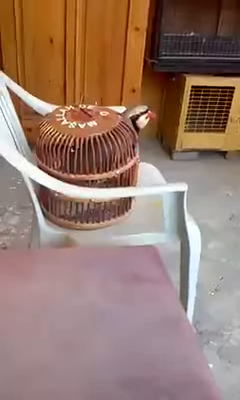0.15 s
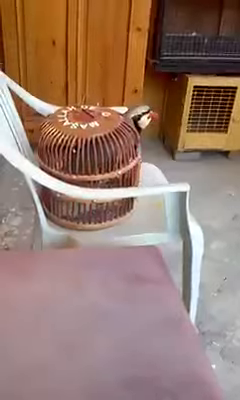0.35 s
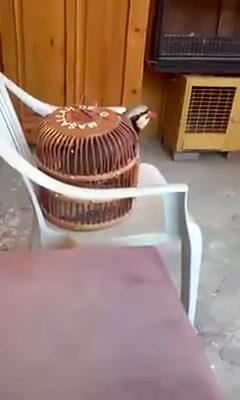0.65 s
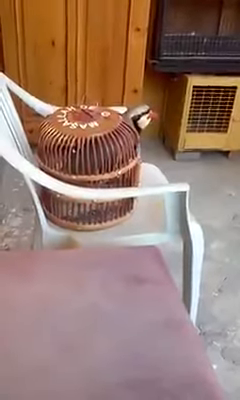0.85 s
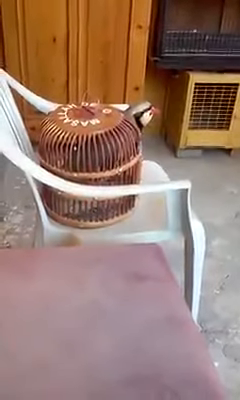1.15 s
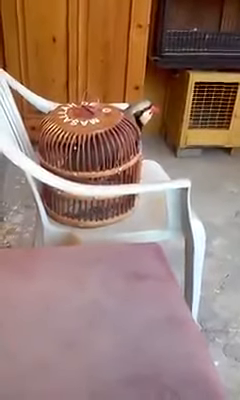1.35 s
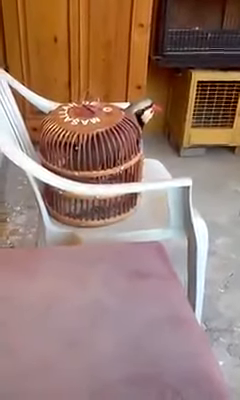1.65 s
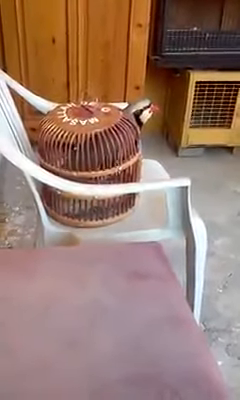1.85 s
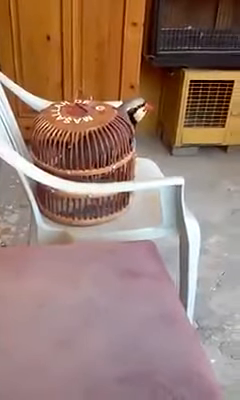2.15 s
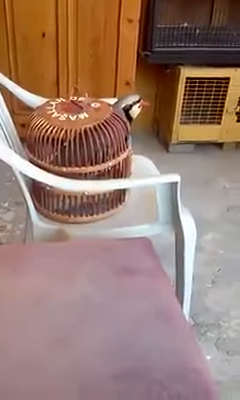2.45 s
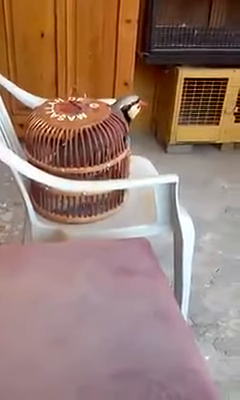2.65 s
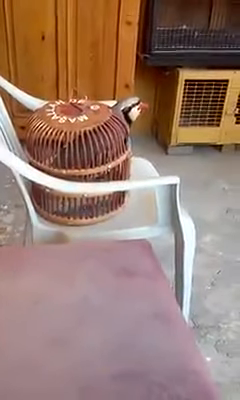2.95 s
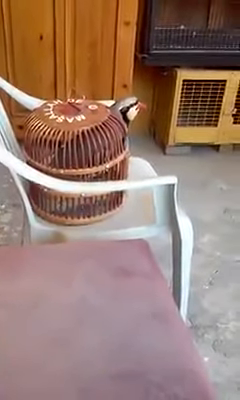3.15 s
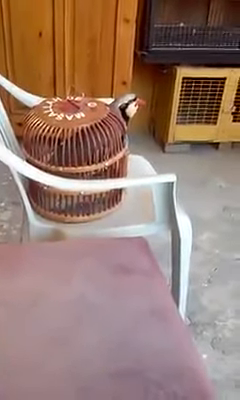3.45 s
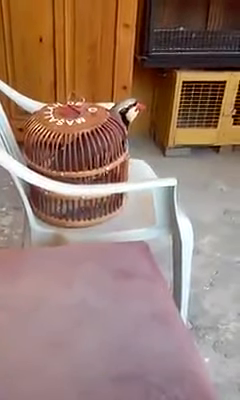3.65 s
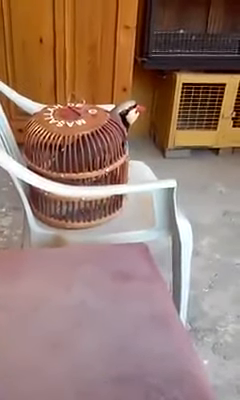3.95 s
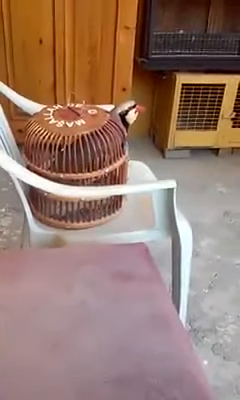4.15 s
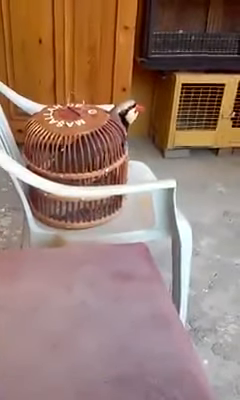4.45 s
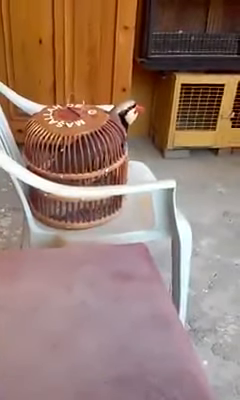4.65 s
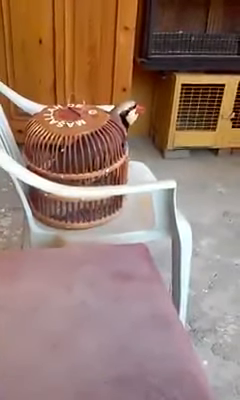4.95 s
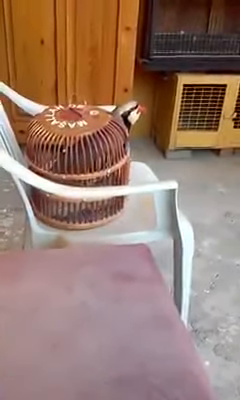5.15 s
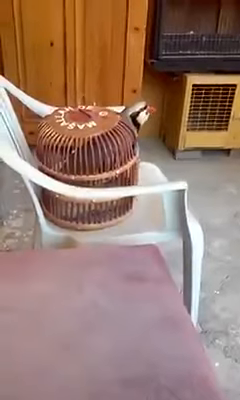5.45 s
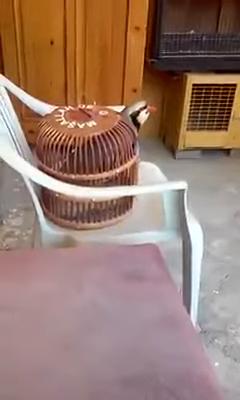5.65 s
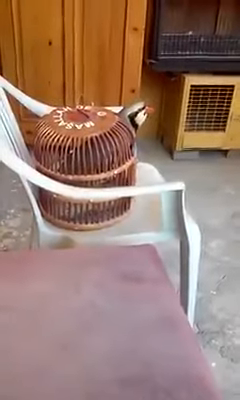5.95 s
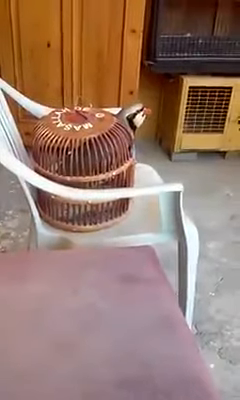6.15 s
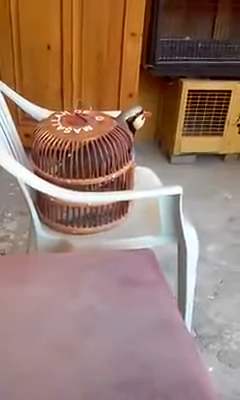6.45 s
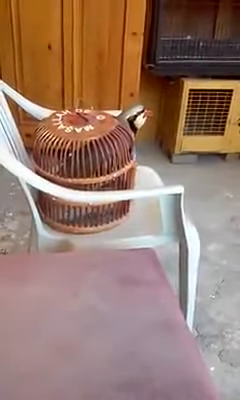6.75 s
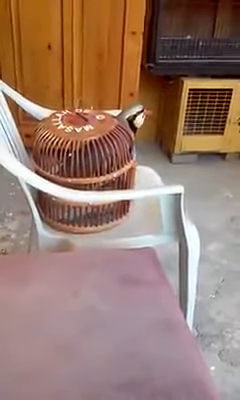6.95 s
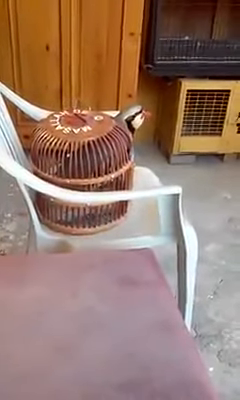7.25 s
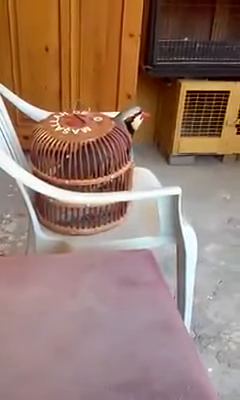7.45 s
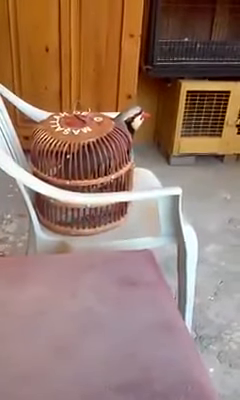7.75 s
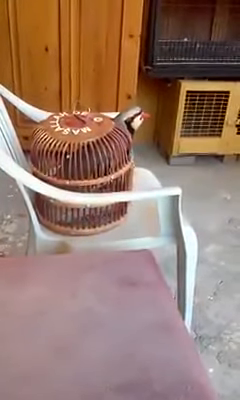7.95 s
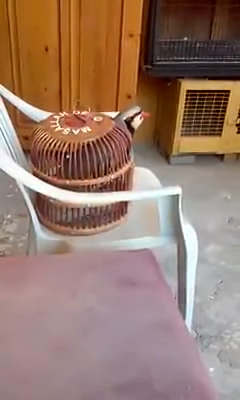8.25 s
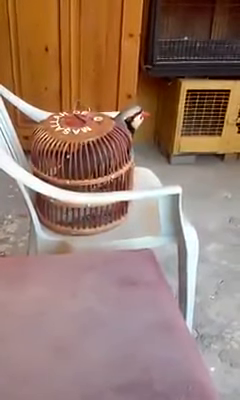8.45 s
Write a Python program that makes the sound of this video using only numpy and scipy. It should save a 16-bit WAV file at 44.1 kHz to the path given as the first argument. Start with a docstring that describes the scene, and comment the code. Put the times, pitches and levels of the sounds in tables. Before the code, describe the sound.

One partridge dominates, heard close in a small walled yard. Dry, woody, rasping chaks come fast, then in a limping pattern of loud call, quiet clucks and weaker call, before a relentless steady burst through the middle. The last calls space out and cease. Faint far bird whistles appear once early and again after the calling. Low airy noise and a wavering hum lie beneath, dropping to near silence in the mono pickup.

```python
"""Loud, falling "chak" syllables of a partridge and soft raspy clucks, about seven a second, ring in a walled yard.
Each is a source-filter voice: syrinx pulses and air puffs excite the throat, windpipe and beak resonances.
Echoes, standing waves and a short diffuse tail form the courtyard.
Far birds whistle as gliding sines, wavering low tones swell as a hum, and shaped noise is the background,
which drops steeply near the end."""
import sys
import numpy as np
from scipy import signal
from scipy.fft import rfft, irfft
from scipy.io import wavfile

SR = 44100
rng = np.random.default_rng(int(sys.argv[2]) if len(sys.argv) > 2 else 0)


def log_audio(samples):
    """Write samples as a 16-bit WAV file to the path given in sys.argv[1]."""
    # one column per channel
    frames = np.atleast_2d(samples).T
    # limit to full scale, then quantise
    limited = np.clip(frames, -1, 1)
    pcm = np.round(limited * 32767).astype(np.int16)
    wavfile.write(sys.argv[1], SR, pcm)


N = 379392
TIME = np.arange(N) / SR  # s


def gain_of(db):
    """Logarithmic level: 20 dB is a factor of ten in amplitude."""
    return 10 ** (np.asarray(db) / 20)


def evened(x):
    """Equal power: scales a signal to an rms of 1."""
    return x / np.sqrt(np.mean(x ** 2) + 1e-20)


def read(points, hz):
    """Logarithmic frequency scale: interpolates a table of (Hz, value) along it."""
    f, value = np.transpose(points)
    return np.interp(np.log(hz + 1), np.log(f + 1), value)


def add(mix, s, sound):
    """Superposition: adds a sound to the mix from time s in seconds."""
    part = mix[max(round(s * SR), 0):][:len(sound)]
    part += sound[:len(part)]


def colour(x, points):
    """Linear filtering: multiplies the spectrum by a table of (Hz, dB)."""
    hz = np.fft.rfftfreq(len(x), 1 / SR)
    return irfft(rfft(x) * gain_of(read(points, hz)), len(x))


def wander(size, rate_hz):
    """Random modulation: straight lines join normal random values drawn rate_hz times a second."""
    at = np.arange(size) * rate_hz / SR
    knots = rng.standard_normal(size // 20 + 4)
    return np.interp(at, np.arange(len(knots)), knots)


def resonate(x, hz, width_hz):
    """Moving resonance: shifts hz down to zero, smooths with one pole and shifts back."""
    turn = np.exp(2j * np.pi * np.cumsum(hz * np.ones(len(x))) / SR)
    pole = np.exp(-np.pi * width_hz / SR)
    smoothed = signal.lfilter([1 - pole], [1, -pole], x / turn)
    return 2 * (turn * smoothed).real


def arch(u, peak, sharp):
    """Amplitude envelope: a warped half sine, zero at u = 0 and 1, with its top at the peak."""
    warped = np.interp(u, [0, np.clip(peak, .05, .95), 1], [0, .5, 1])
    return np.sin(np.pi * warped).clip(0) ** abs(sharp)


def partridge():
    """Call sequence: superposes open-beaked chaks and rougher clucks with the beak nearly shut."""
    # Loud syllables that drop in pitch. Each row: start in seconds, nominal level in dB, length in seconds.
    chaks = [(0.156, -19.5, 0.046), (.282, -19, .044), (0.417, -20.5, 0.051), (0.551, -21.5, 0.05),
             (0.69, -19, .048), (.831, -17, .045), (0.965, -16.5, 0.046), (1.259, -26, 0.044),
             (1.42, -18, 0.043), (1.739, -26.5, 0.044), (1.909, -17.5, 0.059), (2.214, -31, 0.046),
             (2.385, -20.5, 0.055), (2.698, -27, 0.042), (2.879, -22.5, 0.048), (3.187, -27.5, .038),
             (3.373, -18.5, 0.041), (3.696, -30.5, .044), (3.887, -18, 0.052), (4.044, -18, 0.054),
             (4.33, -26, .037), (4.502, -16, 0.046), (4.648, -17, .05), (4.798, -16, 0.052),
             (4.953, -17, 0.055), (5.109, -16.5, .049), (5.26, -16.5, .042), (5.415, -17.5, 0.05),
             (5.544, -16.5, 0.042), (5.69, -19, .053), (5.827, -18, .047), (5.975, -19.5, 0.053),
             (6.124, -17, .045), (6.271, -15.5, .047), (6.395, -18, 0.052), (6.533, -15, 0.046),
             (6.666, -19.5, 0.054), (6.867, -15.5, .052), (7.006, -18.5, 0.047), (7.18, -29.5, .048),
             (7.353, -16, 0.048), (7.658, -26, 0.049)]
    # Soft syllables on an almost level pitch.
    # Each row: start in seconds, nominal level in dB, length in seconds, pitch in Hz.
    clucks = [(1.111, -37, 0.04, 434.7), (1.238, -39, 0.028, 435), (1.551, -35.5, 0.05, 446.2),
              (1.687, -40, 0.046, 435), (2.053, -34, 0.054, 464), (2.183, -38.5, 0.042, 448.5),
              (2.529, -33.5, 0.057, 467), (2.657, -38, .044, 449), (3.021, -34.5, 0.047, 456),
              (3.144, -40, 0.038, 464), (3.531, -32, 0.05, 420.7), (3.662, -38.5, .036, 437),
              (4.205, -31, 0.039, 418.5), (4.32, -35, 0.039, 412), (7.143, -36.5, 0.052, 485.7),
              (7.493, -32, 0.047, 498), (7.613, -38, 0.072, 464)]
    out = np.zeros(N)
    for s, level_db, length in chaks:
        add(out, s, chak(s, level_db, length))
    for s, level_db, length, pitch_hz in clucks:
        add(out, s, cluck(level_db, length, pitch_hz))
    return out


def chak(s, level_db, length):
    """Vocal effort: a louder open-beaked call has higher resonances and a thinner fundamental."""
    # Colour of the rasp with the beak open. Each row: frequency in Hz, gain in dB.
    beak_open = [(1500, -48.5), (2050, -9.5), (2650, -12), (3350, -1.5), (3850, -4.5), (4400, 1),
                 (5150, -5), (5700, -35), (7000, -53.5)]
    # The bird settles: early windpipe resonances are high, early pitch and rasp are low.
    early = np.interp(s, [1.3, 2.2], [1, 0])
    pipe_hz = by_effort(level_db, soft=4190, loud=4375) * (1 + early * 0.107)
    return syllable(
        level_db, length, beak_open, pitch_hz=413.6 * (1 - early * .04),
        throat_hz=by_effort(level_db, soft=925, loud=1196), pipe_hz=pipe_hz,
        chest_db=by_effort(level_db, soft=-12, loud=-21),
        rasp_db=by_effort(level_db, soft=-6.5, loud=-7) - 2.5 * early,
        attack_s=0.02, rise=.04, fall=.39, top=.48, closing=0.28, width_hz=405, jitter=.035,
        rough=1.0, rough_growth=1.5, breathy=0.88, peak=0.49, sharp=0.69, rasp_peak=0.41, rasp_sharp=1.6,
        pipe_db=-2.5, chest_peak=0.78, hiss_db=-15.0, hiss_sharp=2.4)


def cluck(level_db, length, pitch_hz):
    """Vocal effort, beak nearly shut: louder calls raise the throat resonance and brighten the hiss."""
    # Colour of the rasp with the beak nearly shut. Each row: frequency in Hz, gain in dB.
    beak_shut = [(600, -44), (1050, -10.5), (1550, 9.5), (1850, -11), (2100, 1), (2550, -19.5), (3350, 2),
                 (4350, -2.5), (5200, -8.5), (7000, -29)]
    return syllable(
        level_db, length, beak_shut, pitch_hz=pitch_hz,
        throat_hz=by_effort(level_db, soft=855, loud=950), pipe_hz=4307, chest_db=-9, rasp_db=1.25,
        attack_s=0.014, rise=-.036, fall=0.086, top=.33, closing=0.17, width_hz=590, jitter=0.071,
        rough=3.4, rough_growth=1.5, breathy=0.97, peak=0.37, sharp=0.48, rasp_peak=0.3, rasp_sharp=0.59,
        pipe_db=-4.0, chest_peak=0.53, hiss_db=-21.0, hiss_sharp=0.48)


def by_effort(level_db, soft, loud):
    """Linear effort law: takes the soft value at -30 dB and the loud value at -17 dB."""
    soft_db, loud_db = -30, -17
    return soft + (loud - soft) * (level_db - soft_db) / (loud_db - soft_db)


def syllable(level_db, length, beak, pitch_hz, throat_hz, pipe_hz, chest_db, rasp_db, attack_s, rise, fall,
             top, closing, width_hz, jitter, rough, rough_growth, breathy, peak, sharp, rasp_peak, rasp_sharp,
             pipe_db, chest_peak, hiss_db, hiss_sharp):
    """Source-filter voice: syrinx pulses and a puff each cycle excite resonances that sink as the beak closes."""
    # The throat passes little above its main resonance. Each row: frequency in Hz, gain in dB.
    throat_colour = [(300, 3.5), (750, 4), (1000, -0.5), (1250, 3), (1500, 2), (1700, -12), (2000, -18.5),
                     (3500, -33)]
    # Hiss of the air forced through the beak. Each row: frequency in Hz, gain in dB.
    hiss_colour = [(2000, -31.5), (5500, -3.5), (7200, 3.5), (8800, 3), (9900, -8.5), (11000, 0.5),
                   (12500, -4), (13500, -17), (15000, -15.5)]
    size = SR // 12
    t = np.arange(size) / SR
    u = np.minimum(t / length, 1)  # share of the syllable elapsed

    # Pitch drifts towards its top, then falls.
    sinking = np.clip((u - top) / (1 - np.clip(top, 0, .9)), 0, 1) ** 1.4
    glide = 1 - rise * np.maximum(top - u, 0) - np.clip(fall, 0, .7) * sinking
    hz = pitch_hz * glide * (1 + jitter * wander(size, 500))
    turns = np.cumsum(hz) / SR

    harmonics = np.arange(2, 20)[:, None]  # the fundamental comes from the chest
    pulses = evened(np.cos(2 * np.pi * harmonics * turns).sum(0))
    pulses = pulses * gain_of(3.85 * wander(size, 400.2))  # no two cycles are equally strong
    puff_shape = 0.34 + np.exp(-(turns % 1) / 0.25)
    puffs = evened(puff_shape * rng.standard_normal(size))

    throat = throat_hz * (1 + closing * (.5 - u))
    croak = pulses + (rough + rough_growth * u ** 2) * puffs  # the voice breaks up towards its end
    throat_sound = resonate(resonate(croak, throat, width_hz), throat, width_hz)
    voice = evened(colour(throat_sound, throat_colour))

    drive = pulses + breathy * puffs
    pipe = pipe_hz * (1 + 0.096 * (.45 - u))
    whistle = evened(resonate(resonate(drive, pipe, 170), pipe, 270))
    beak_sound = evened(colour(drive, [(200, -65.0)] + beak))
    rasp = evened(beak_sound + gain_of(pipe_db) * whistle)

    breath = (1 + 0.14 * np.cos(2 * np.pi * turns)) * rng.standard_normal(size)
    hiss = evened(colour(breath, hiss_colour))
    hiss = hiss * gain_of(hiss_db + .25 * (level_db + rasp_db + 23.5))  # harder blown is brighter

    edge = rasp * arch(u, rasp_peak, rasp_sharp) + hiss * arch(u, 0.47, hiss_sharp)
    chest = evened(np.sin(2 * np.pi * turns)) * arch(u, chest_peak, 0.85)
    sound = voice * arch(u, peak, sharp) + gain_of(rasp_db) * edge + gain_of(chest_db) * chest
    pressure = np.minimum(t / attack_s + 0.057, 1)
    return gain_of(level_db) * pressure * sound


def courtyard(x, wet_db=-2.5, modes_db=-2):
    """Room acoustics: direct sound, echoes and a diffuse tail blended from three, coloured by standing waves."""
    # Reflections from nearby seat, table, floor and walls. Each row: delay in seconds, gain as a factor.
    echoes = [(.00234, 0.28), (.00374, -0.24), (.00825, -0.29), (0.0143, .22), (0.0165, -.25), (.024, 0.1)]
    # Standing waves between the walls.
    # Each row: frequency in Hz, level in dB before the common trim modes_db, time to fall 60 dB in seconds.
    yard_modes = [(300.6, -1.5, 0.067), (418, -10, 0.16), (435, 6, 0.25), (464, 10, 0.15), (521, 7.5, 0.26),
                  (647.4, 8, 0.28), (678, -7, 0.57), (805, -18, 0.46), (769, -1, 0.27), (844, -18, 0.41),
                  (899, -7, 0.1), (999, -1.5, 0.17), (1239, -8.5, 0.57), (1140, -19, 0.34),
                  (1276, -1.5, 0.17), (1286, -3.5, .3), (1383, 5, 0.13), (2060, -10.5, 0.318),
                  (2570, 8.5, 0.16), (2896, -17, 0.63), (3300, -11, 0.15), (3528, 2, 0.34),
                  (4160, -5, 0.15), (4460, -6, .25)]
    # Decay of the diffuse tail. Each row: frequency in Hz, time to fall 60 dB in seconds.
    yard_t60 = [(200, 0.11), (600, 0.26), (1200, .26), (1600, 0.16), (2100, 0.28), (2800, 0.16),
                (4000, 0.25), (5300, .15), (8000, 0.22), (14000, 0.12)]
    # Notches cut by reflections from the seat and table top. Each row: frequency in Hz, gain in dB.
    notches = [(520, 1), (580, -4.5), (660, -0.5), (1000, 4.5), (1060, -3), (1130, -1), (1650, 1),
               (1860, 5), (2030, -2), (3520, 1.5), (3660, -5.5), (3800, -2)]
    t = np.arange(SR // 2) / SR
    early = np.zeros(len(t))
    for delay, gain in [(0.00061, 1)] + echoes:  # the direct sound comes first
        add(early, delay, np.array([gain]))

    standing = 1. * (t == 0)
    for hz, db, t60 in yard_modes:
        decay = np.log(1000) / t60
        ring = np.exp(-decay * t) * np.cos(2 * np.pi * hz * t)
        standing += gain_of(db + modes_db) * 2 * decay / SR * ring

    # Three random tails fade into one another, so no ringing line of one tail lasts.
    shares = np.cos(np.pi * (TIME * .9 + np.arange(3)[:, None] / 3)) ** 2
    weights = shares / np.linalg.norm(shares, axis=0)
    tail = sum(reverberation(x * weight, yard_t60) for weight in weights)
    heard = signal.fftconvolve(x, early)[:N] + gain_of(wet_db) * tail
    return colour(signal.fftconvolve(heard, standing)[:N], notches)


def reverberation(x, t60, build=0.0063):
    """Diffuse decay: sparse reflections of random sign, each band dying exponentially at its own speed."""
    t = np.arange(SR) / SR
    onset = np.clip(t / build - .3, 0, 1)
    taps = rng.standard_normal(SR) * (rng.random(SR) < .12) * onset
    hz, frame_s, bands = signal.stft(taps, SR, nperseg=256)
    fading = gain_of(-60 * frame_s / read(t60, hz)[:, None])
    tail = signal.istft(bands * fading, SR, nperseg=256)[1]
    return signal.fftconvolve(x, tail / np.linalg.norm(tail))[:N]


def far_bird():
    """Frequency modulation: thin wavering sines glide down, with a longer diffuse echo."""
    # Far small birds.
    # Each row: start in seconds, length in seconds, pitch in Hz, level in dB before the direct and echo gains.
    chirps = [(2.284, 0.53, 2860, -47), (7.701, 0.074, 2370, -39), (7.748, 0.12, 1767, -44.5),
              (7.967, 0.095, 2100, -51.5), (7.971, 0.038, 1396, -52)]
    out = np.zeros(N)
    for s, length, pitch_hz, db in chirps:
        u = np.linspace(0, 1, int(length * SR))
        hz = pitch_hz * (1 + 0.042 * (.5 - u) + 0.031 * wander(len(u), 500))
        whistle = np.sin(2 * np.pi * np.cumsum(hz) / SR)
        add(out, s, gain_of(db) * arch(u, 0.18, 0.65) * whistle)
    return 0.48 * out + 0.32 * reverberation(out, [(1000, 0.78), (4000, 0.31)])


def low_hum():
    """Amplitude modulation: low tones of drifting pitch flutter, swell and fade."""
    # Swells of the hum.
    # Each row: start in seconds, length in seconds, pitch in Hz, level in dB before flutter and fades.
    hums = [(.05, 1.1, 123.5, -44.5), (2.68, .91, 30.6, -53), (3.03, .59, 122.4, -53),
            (3.55, 0.226, 179, -56), (4.26, .2, 177, -55.5), (6.0, 1.2, 182, -52), (6.58, 0.31, 242, -50),
            (7.15, 0.3, 132.3, -53)]
    out = np.zeros(N)
    for s, length, pitch_hz, db in hums:
        size = int(length * SR)
        hz = pitch_hz * (1 + 0.015 * wander(size, 12))
        tone = evened(np.sin(2 * np.pi * np.cumsum(hz) / SR))
        flutter = 1 + 0.52 * wander(size, 24.62)
        add(out, s, gain_of(db) * tone * flutter * signal.windows.tukey(size, .4))
    return out


def background_noise(noise_db=4):
    """Filtered noise: shaped white noise whose level varies and drops steeply near the end."""
    # Spectrum of the background noise. Each row: frequency in Hz, relative density in dB per Hz.
    noise_colour = [(25, -15.5), (70, 0), (200, -8), (400, -9), (1000, -18), (2500, -20), (4500, -19.5),
                    (5800, -28), (8000, -25.5), (10000, -33), (12000, -27), (13700, -35.5), (15000, -35)]
    # Course of the background noise level.
    # Each row: time in seconds, level in dB before the common trim noise_db.
    noise_level = [(.2, -56), (.8, -55), (1.35, -63.5), (2.55, -62.5), (2.75, -57.5), (3.5, -62.5),
                   (4.9, -56.5), (6.6, -57.5), (7.7, -59), (8.15, -81.5), (8.6, -78)]
    level_db = noise_db + np.interp(TIME, *np.transpose(noise_level))
    return gain_of(level_db) * evened(colour(rng.standard_normal(N), noise_colour))


def scene():
    """Superposition: the partridge in its courtyard, far birds, hum and noise as one channel."""
    return (courtyard(partridge()) + far_bird() + low_hum() + background_noise())[None]


def record(dry):
    """Band limiting: a steep linear-phase low-pass, after a silent start that hides most of the first chak."""
    start_s, edge_hz = .199, 15800
    low_pass = signal.firwin(511, edge_hz, window=("kaiser", 9), fs=SR)
    return signal.oaconvolve(dry * (TIME >= start_s), low_pass[None], "same")


dry = scene()
out = record(dry)
log_audio(out)
```